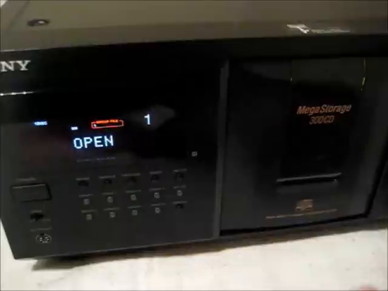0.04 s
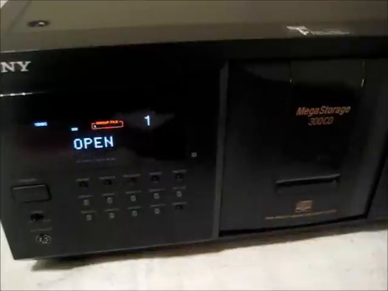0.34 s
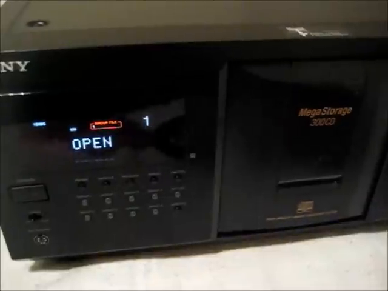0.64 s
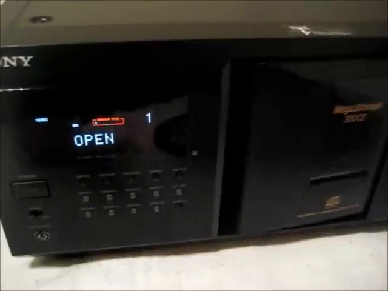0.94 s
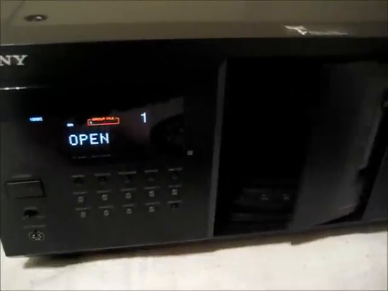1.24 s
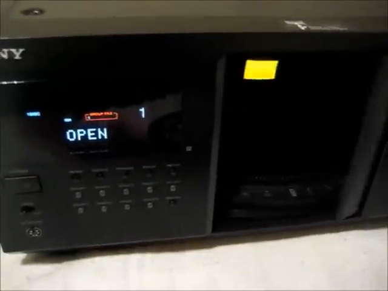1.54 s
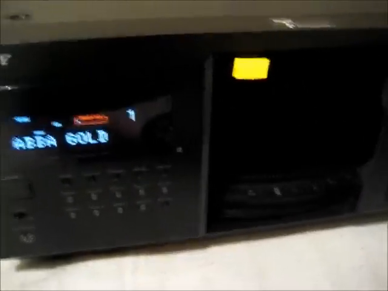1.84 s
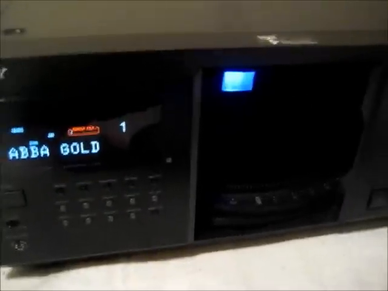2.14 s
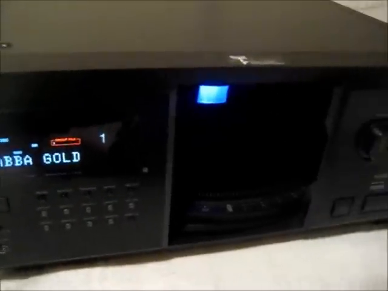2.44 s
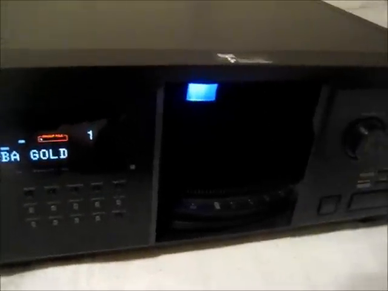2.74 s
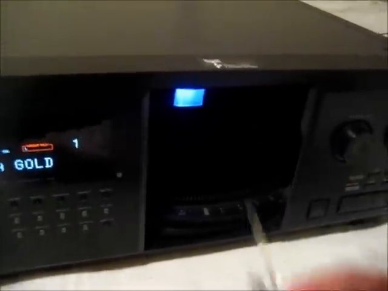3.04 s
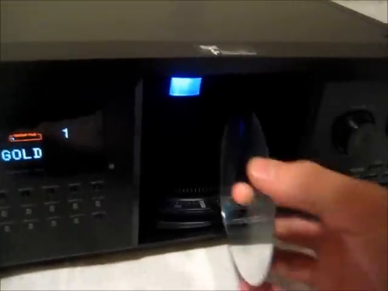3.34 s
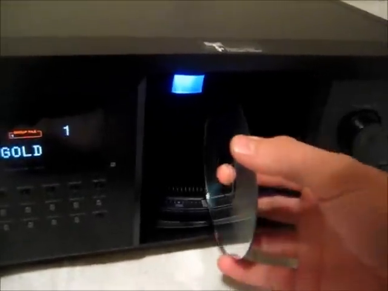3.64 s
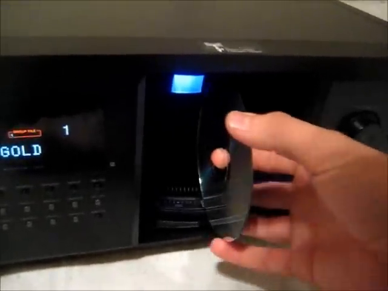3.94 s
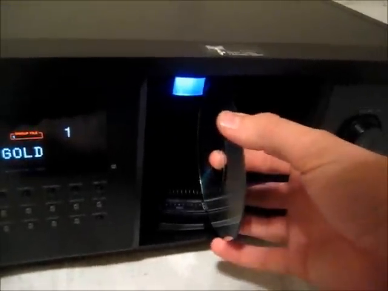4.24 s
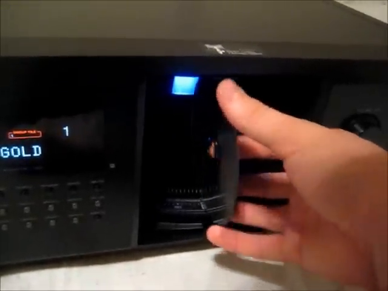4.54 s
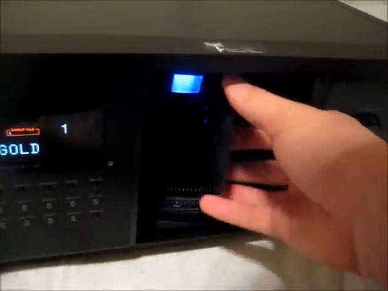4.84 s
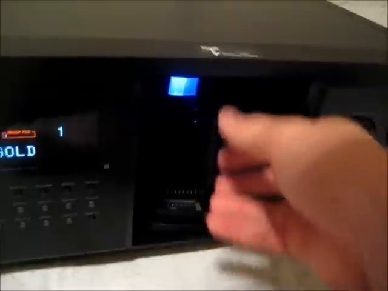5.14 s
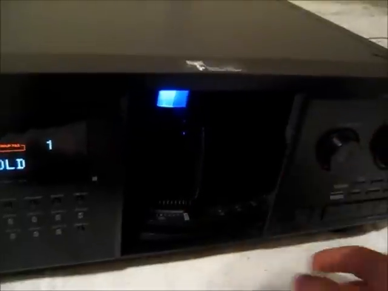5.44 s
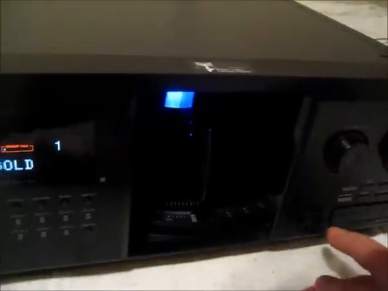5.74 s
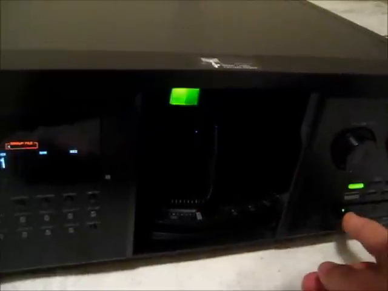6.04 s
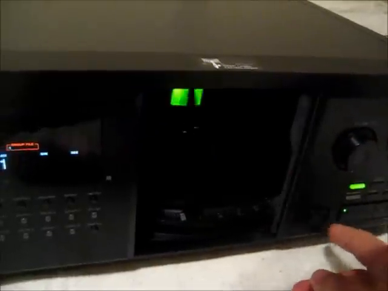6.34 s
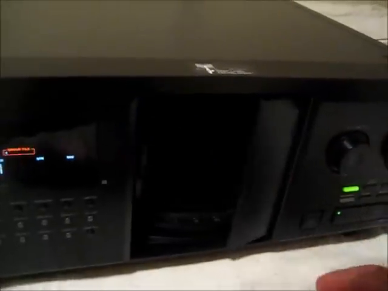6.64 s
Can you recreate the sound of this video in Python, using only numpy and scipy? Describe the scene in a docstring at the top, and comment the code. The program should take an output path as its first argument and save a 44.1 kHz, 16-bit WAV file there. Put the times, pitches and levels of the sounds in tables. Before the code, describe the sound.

A small motor slides a plastic door open with a clack; a disc drops into its slot, a button clicks, and whirring resumes.

```python
"""Carousel disc changer, close by in a small room.

A motor slides the door open until it clacks against the stop; the carousel clicks into place.
A hand feels for the slot with a disc, which drops in and rolls home. A button is pressed and the door
starts to close, over faint hiss and a thin electronic whine. Blows and friction slips ring the
resonances of the plastic parts and the sheet-metal cabinet."""
import sys
import numpy as np
from scipy import signal
from scipy.fft import rfft, irfft, next_fast_len
from scipy.io import wavfile
from scipy.ndimage import uniform_filter1d

SR = 44100
rng = np.random.default_rng(int(sys.argv[2]) if len(sys.argv) > 2 else 0)


def wrap_up_sound(samples):
    """Save the sound to the file named by the first command line argument, as 16-bit audio."""
    columns = np.atleast_2d(samples).T
    # keep every value between -1 and 1, then stretch to whole-number steps
    tamed = np.clip(columns, -1, 1)
    steps = np.round(tamed * 32767).astype(np.int16)
    wavfile.write(sys.argv[1], SR, steps)


N = 303408
TIME = np.arange(N) / SR
CUTOFF_HZ = 15900

# sheet-metal cabinet: pitch_hz, width_hz, gain_db
CABINET_MODES = [(89.6, 8.1, -6), (119.4, 5.3, -7), (138.5, 8, -3), (169, 17, -3.5), (201.3, 5.1, 7),
                 (240, 22, -3), (287.5, 8.8, -7.5), (422, 24, -9.5)]
# how well its panels radiate: freq_hz, gain_db
CABINET_RADIATION = [(50, -4), (90, -3), (130, 1.5), (300, -4), (600, -2.5)]


def from_db(db):
    """Decibels to gain."""
    return 10 ** (np.asarray(db) / 20)


def rms_one(x):
    """Scale to rms 1."""
    return x / np.sqrt(np.mean(x ** 2) + 1e-20)


def drift(rate_hz):
    """Slow random curve of rms 1."""
    knots = rng.standard_normal(4096)
    return rms_one(np.interp(TIME * rate_hz, np.arange(len(knots)), knots))


def held(start_s, stop_s, rise_s, fall_s):
    """Envelope: linear rise, hold, exponential fall."""
    return np.clip((TIME - start_s) / rise_s, 0, 1) * np.exp(-np.maximum(TIME - stop_s, 0) / fall_s)


def surge(start_s, extra_db, settle_s):
    """Gain that starts high and settles to 1."""
    return from_db(extra_db * np.exp(-(np.maximum(TIME - start_s, 0) / settle_s) ** 2))


def swell(middle_s, half_s):
    """Gaussian envelope of height 1."""
    return np.exp(-((TIME - middle_s) / half_s) ** 2)


def add(out, sound, start_s, level_db):
    """Place a short sound; its level is its energy spread over 10 ms."""
    at = round(start_s * SR)
    sound = from_db(level_db) * np.sqrt(SR / 100) * sound / np.linalg.norm(sound)
    out[at:at + len(sound)] += sound[:N - at]


def coloured(x, colour):
    """Minimum-phase filter through (freq_hz, gain_db) points."""
    size = next_fast_len(len(x) + 4096, True) * 2
    hz, db = np.transpose(colour)
    bins_hz = np.maximum(np.fft.rfftfreq(size, 1 / SR), 1)
    gain = from_db(np.interp(np.log(bins_hz), np.log(hz), db))
    cepstrum = irfft(np.log(gain))
    cepstrum[1:size // 2] *= 2
    cepstrum[size // 2 + 1:] = 0
    return irfft(rfft(x, size) * np.exp(rfft(cepstrum)))[:len(x)]


def levelled(force):
    """Flatten a burst's broad spectrum, so the struck part sets the colour."""
    power = uniform_filter1d(np.abs(rfft(force)) ** 2, size=140) + 1e-6
    hz = np.fft.rfftfreq(len(force), 1 / SR)
    return coloured(force, np.transpose([hz, -10 * np.log10(power)])[1:])


def resonate(x, modes):
    """Parallel two-pole resonators."""
    out = 0
    for pitch_hz, width_hz, gain_db in modes:
        r = np.exp(-np.pi * width_hz / SR)
        poles = [1, -2 * r * np.cos(2 * np.pi * pitch_hz / SR), r * r]
        out = out + from_db(gain_db) * (1 - r * r) / 2 * signal.lfilter([1, 0, -1], poles, x + 1e-18)
    return out


def body(x, colour, modes, ring_db):
    """A part's response: broad colour with modes standing out."""
    return coloured(x + from_db(ring_db) * resonate(x, modes), colour)


def grains(per_s, spread_db):
    """Friction: tiny slips of uneven size at random moments."""
    sizes = from_db(spread_db * np.minimum(rng.exponential(1, N), 4)) * rng.choice([-1, 1], N)
    return rms_one(sizes * (rng.random(N) < per_s / SR))


def boom():
    """The cabinet panels shudder and settle."""
    t = np.arange(SR // 2) / SR
    shudder = rng.standard_normal(len(t)) * np.exp(-t / 0.033)
    return coloured(resonate(levelled(shudder), CABINET_MODES), CABINET_RADIATION)


def blows(hits, colour, modes, ring_db, chatter_db, spring_db, click_db, boom_db):
    """Each blow: a sharp push plus dying chatter of loose plastic; a share shakes the cabinet."""
    t = np.arange(SR // 3) / SR
    out = np.zeros(N)
    for start_s, level_db, hardness_hz, chatter_t60_s in hits:
        chatter = rng.standard_normal(len(t)) * np.exp(-np.log(1000) * t / chatter_t60_s)
        force = levelled(from_db(chatter_db) * chatter / np.linalg.norm(chatter) + (t == 0))
        # a soft contact lacks treble, but for a faint click
        softness = signal.butter(2, min(hardness_hz, SR / 2 - 1000), fs=SR, output="sos")
        contact = signal.sosfilt(softness, force) + from_db(click_db) * force
        # its springiness favours pitches near that edge
        spring_hz = min(hardness_hz, CUTOFF_HZ)
        contact += resonate(force, [(spring_hz, 0.54 * spring_hz, spring_db)])
        add(out, body(contact, colour, modes, ring_db), start_s, level_db)
        add(out, boom(), start_s, level_db + boom_db)
    return out


def background():
    """Steady hiss and an electronic whine that buzzes as its phase restarts."""
    # hiss spectrum: freq_hz, gain_db
    hiss_colour = [(15, -28), (25, -8), (80, -7), (242, -1.5), (270, -8), (317, -7.5), (560, -8),
                   (1480, -12), (2160, -13.5), (4030, -15.5), (7110, -18.5), (7710, -18.5), (8590, -20),
                   (14800, -25), (16000, -37)]
    # whine partials: pitch_hz, level_db
    tones = [(7569, -60.5), (7872, -65), (15138, -60.5)]
    hiss_db, restart_hz = -47, 30
    hiss = from_db(hiss_db) * rms_one(coloured(rng.standard_normal(N), hiss_colour))
    since_restart_s = TIME % (1 / restart_hz)
    whine = sum(from_db(db) * np.sqrt(2) * np.sin(2 * np.pi * hz * since_restart_s) for hz, db in tones)
    return hiss + whine


def drive_levels():
    """Gains of motor, gears and sliding: each runs up, holds and grows with the load."""
    # door opens, then closes: start_s, slide_start_s, stop_s, motor_db, gears_db, sliding_db
    runs = [(0.025, 0.75, 1.775, -45.5, -50.5, -40.5), (6.062, 6.15, 6.88, -42, -47, -40)]
    # stiff spots of the door: middle_s, half_length_s, load_db
    strains = [(0.32, .08, 3.5), (1.06, 0.19, 7), (1.745, 0.036, 7), (6.794, .2, 4)]
    # fits of gear rattle: start_s, length_s, level_db
    rattles = [(0.222, 0.012, -43), (0.258, 0.035, -43.5), (.496, 0.097, -46.5), (.781, .017, -31.5),
               (.814, .018, -36.5), (.95, .015, -41), (1.052, 0.091, -37), (1.75, .022, -35),
               (6.26, 0.065, -39.5), (6.37, 0.084, -41), (6.552, 0.16, -42), (6.806, 0.064, -42.5)]
    gear_load_share, slide_load_share = 0.17, 0.25
    run_down_s, idle_rub_db = 0.057, -49.5
    load_db = sum(db * swell(middle_s, half_s) for middle_s, half_s, db in strains)
    motor = gears = sliding = 0
    for start_s, slide_start_s, stop_s, motor_db, gears_db, sliding_db in runs:
        turning = held(start_s, stop_s, rise_s=0.21, fall_s=run_down_s)
        moving = held(slide_start_s, stop_s, rise_s=0.26, fall_s=run_down_s)
        motor += turning * from_db(motor_db + load_db)
        gears += turning ** 2 * from_db(gears_db + gear_load_share * load_db)
        door_rub = moving * from_db(sliding_db + slide_load_share * load_db)
        sliding += np.hypot(door_rub, turning ** 2 * from_db(idle_rub_db))
    fits = sum(from_db(db) * held(start_s, start_s + length_s, rise_s=0.011, fall_s=0.006)
               for start_s, length_s, db in rattles)
    # a soft hiss swells after the door's clack, then lingers faintly
    after_hiss = from_db(-54) * held(start_s=1.9, stop_s=3.1, rise_s=0.064, fall_s=0.05)
    after_hiss *= surge(start_s=1.9, extra_db=13.5, settle_s=0.16)
    return motor, np.hypot(gears, fits), sliding + after_hiss


def motor_rumble():
    """The motor shakes the cabinet."""
    # rumble spectrum: freq_hz, gain_db
    colour = [(29, -20), (50, -18), (103, -3.5), (168, -5), (194, -2), (307, -11), (363, -8.5), (415, -2.5),
              (626, -10.5), (690, -7.5), (900, -9.5), (1170, -9.5), (1980, -120)]
    return rms_one(body(grains(per_s=1500, spread_db=1.5), colour, CABINET_MODES, ring_db=5.5))


def gear_rattle():
    """Gear teeth ring their housing, which passes only a middle band."""
    # gear housing: pitch_hz, width_hz, gain_db
    modes = [(716, 330, -12), (1058, 60, 4.5), (1338, 176, 6), (1450, 33, -7)]
    housing = signal.butter(2, [600, 1780], "band", fs=SR, output="sos")
    teeth = grains(per_s=1400, spread_db=-1.0) * from_db(2.0 * drift(rate_hz=130))
    return rms_one(signal.sosfilt(housing, resonate(teeth, modes)))


def track_rub():
    """The door rubs along its curved track; each mode comes and goes as the contact travels."""
    # sliding spectrum: freq_hz, gain_db
    colour = [(260, -31), (450, -1.5), (633, -17), (838, -2.5), (1160, -21.5), (1470, -6), (2360, -5),
              (2620, -4.5), (7180, -14.5), (9790, -16.5), (15500, -27.5)]
    # sliding door: pitch_hz, width_hz, gain_db
    modes = [(2190, 65, -15), (3090, 79, -16), (3810, 120, -12), (4530, 82, -7), (5570, 210, -15),
             (9500, 160, -12.5), (13100, 150, -7)]
    slips = grains(per_s=14000, spread_db=-1.0) * from_db(0.68 * drift(rate_hz=56))
    singing = sum(resonate(slips, [mode]) * from_db(6.9 * drift(rate_hz=6)) for mode in modes)
    return rms_one(coloured(slips + from_db(5.0) * singing, colour))


def door_drive():
    """Motor, gears and track, each under its own envelope."""
    motor, gears, sliding = drive_levels()
    return motor * motor_rumble() + gears * gear_rattle() + sliding * track_rub()


def brushes():
    """Door, fingers and disc rub on plastic; the point of contact sets each resonance."""
    # light rubs: middle_s, half_length_s, level_db, pitch_hz, width_hz
    rubs = [(0.246, 0.033, -48, 6040, 3000), (0.874, 0.031, -42.5, 3750, 500), (1.1, .12, -47, 3750, 350),
            (1.672, 0.071, -46, 2670, 90), (3.673, 0.006, -35, 2860, 300), (3.772, 0.011, -45.5, 2700, 500),
            (4.147, 0.018, -46.5, 5970, 3000), (4.524, 0.021, -36, 2260, 900),
            (4.55, 0.02, -47, 5870, 2000), (4.664, 0.017, -40.5, 2560, 1000),
            (4.882, 0.013, -35, 5000, 1390)]
    # rustle spectrum: freq_hz, gain_db
    colour = [(590, -64), (1000, -43), (1600, 0), (1980, 5.5), (2420, 0), (3790, -10), (4790, -10),
              (7920, -12), (14500, -18)]
    slips = grains(per_s=6000, spread_db=4.5)
    rustle = from_db(-11.0) * rms_one(coloured(slips, colour))
    out = np.zeros(N)
    for middle_s, half_s, level_db, pitch_hz, width_hz in rubs:
        singing = rms_one(resonate(slips, [(pitch_hz, width_hz, 0)]))
        out += from_db(level_db) * swell(middle_s, half_s) * (rustle + singing)
    return out


def door_clacks():
    """The door ticks past its latch, hits its stop and rebounds; one more tick as it closes."""
    # door impacts: start_s, level_db, hardness_hz, chatter_t60_s
    hits = [(1.7362, -34.5, 9000, 0.011), (1.7765, -36, 6000, .01), (1.7925, -34.5, 950, 0.013),
            (1.8523, -26.5, 4500, 0.081), (1.8672, -20, 4470, 0.022), (1.8703, -14.5, 10000, 0.0047),
            (1.872, -17.5, 600, 0.015), (1.8823, -16.5, 660, 0.038), (6.6152, -33, 5900, .014)]
    # door response: freq_hz, gain_db
    colour = [(50, -7), (110, -2.5), (400, -0.5), (750, -3), (1050, 2), (1500, 1), (2100, -1.5),
              (2900, 1.5), (3900, 6.5), (4650, 0), (5400, 3), (8500, 0), (15500, -8)]
    # door resonances: pitch_hz, width_hz, gain_db
    modes = [(441, 40, -3), (560, 60, -11), (650, 36, 6), (790, 70, -1), (1255, 70, -4), (1500, 90, -6),
             (2870, 250, -8)]
    return blows(hits, colour, modes,
                 ring_db=10.0, chatter_db=17.5, spring_db=-4.5, click_db=-27.0, boom_db=-30.0)


def ticking():
    """Faint, very high ticks while the carousel settles."""
    ticks = rms_one(resonate(grains(per_s=55, spread_db=-4.0), [(13900, 1000, 0)]))
    return from_db(-61.5) * held(start_s=1.92, stop_s=2.73, rise_s=0.1, fall_s=0.03) * ticks


def carousel():
    """The carousel latches, then rocks in its play; light knocks chatter longer than firm ones."""
    # latch and rocking: start_s, level_db, hardness_hz
    knocks = [(2.3181, -18, 13000), (2.3255, -30, 3000), (2.352, -39, 1400), (2.41, -45, 1800),
              (2.435, -39, 1500), (2.458, -38.5, 4500), (2.466, -37.5, 1000), (2.538, -39, 1500),
              (2.561, -31.5, 970), (2.614, -42.5, 4500), (5.5805, -41.5, 905), (5.6604, -45, 900),
              (5.7532, -41, 1060)]
    # carousel response: freq_hz, gain_db
    colour = [(120, -22), (230, -18), (330, -1), (650, -9.5), (950, 4), (1250, -15.5), (1600, -10.5),
              (2300, -2), (4000, -4.5), (5700, -5), (9000, -20), (15500, -32)]
    # carousel resonances: pitch_hz, width_hz, gain_db
    modes = [(328, 90, -5), (630, 73, 13), (900, 48, 0.5), (1500, 130, 4), (4380, 200, -7)]
    ref_t60_s, ref_db, halving_db = 0.029, -41, 15.5
    hits = [(start_s, db, hardness_hz, ref_t60_s * 0.5 ** ((db - ref_db) / halving_db))
            for start_s, db, hardness_hz in knocks]
    return blows(hits, colour, modes,
                 ring_db=3.5, chatter_db=7.0, spring_db=0.5, click_db=-11.0, boom_db=-36.0)


def judder():
    """The carousel drive chatters briefly against its brake."""
    # judder spectrum: freq_hz, gain_db
    colour = [(240, -56), (400, -27), (756, -18), (1060, -11.5), (1210, -11), (1910, -5), (2580, -10),
              (2960, -9.5), (3390, -15.5), (4880, -13.5), (7130, -24.5), (9660, -24.5), (15000, -44)]
    # drive resonances: pitch_hz, width_hz, gain_db
    modes = [(1040, 81, 0.5), (1305, 73, 1), (1950, 110, -8), (2160, 81, -7), (3000, 50, -1),
             (4950, 150, -9), (5470, 70, 0), (6500, 77, 3)]
    braking = from_db(-23.5) * held(start_s=2.9015, stop_s=2.941, rise_s=0.001, fall_s=0.0035)
    return braking * rms_one(body(grains(per_s=6800, spread_db=-1.5), colour, modes, ring_db=5.5))


def slot_taps():
    """The held disc knocks against the slot."""
    # taps: start_s, level_db, hardness_hz, chatter_t60_s
    hits = [(3.6675, -31.5, 517, .04), (3.6975, -36.5, 6000, .01), (3.8288, -36.5, 5500, .025),
            (3.866, -39.5, 557, 0.022), (4.062, -22.5, 1480, 0.093), (4.1226, -37, 2600, .025),
            (4.159, -43, 7000, .03), (4.2085, -22, 2360, .048), (4.516, -39, 2600, .09),
            (4.6634, -36, 2620, .1)]
    # slot response: freq_hz, gain_db
    colour = [(150, -19), (300, -10.5), (500, -4), (800, -4.5), (1300, 3), (1900, 0.5), (2450, 3),
              (3800, -8.5), (5300, 0.5), (12000, -9)]
    # slot resonances: pitch_hz, width_hz, gain_db
    modes = [(451, 30, 4), (820, 70, 1.5), (1280, 29, -13), (1864, 40, -2.5), (2300, 130, -5),
             (2600, 31, -10), (2900, 160, -6)]
    return blows(hits, colour, modes,
                 ring_db=7.5, chatter_db=11.5, spring_db=-4.0, click_db=-28.0, boom_db=-22.0)


def hand_bumps():
    """The hand leans on the cabinet, which booms softly."""
    # soft pushes: start_s, level_db
    pushes = [(3.668, -36.5), (3.75, -40), (3.866, -31), (4.07, -36), (4.13, -35), (4.2088, -30),
              (4.483, -33), (4.663, -45), (5.998, -36.5), (6.128, -30.5)]
    out = np.zeros(N)
    for start_s, level_db in pushes:
        add(out, boom(), start_s, level_db)
    return out


def disc_drop():
    """The disc bounces and rolls down its slot; both ring its modes and shake the cabinet."""
    # drop and bounces: start_s, level_db, hardness_hz, chatter_t60_s
    hits = [(4.914, -8, 10900, 0.032), (4.9585, -17.5, 8200, 0.044), (4.962, -16.5, 1950, 0.048),
            (5.011, -31, 12000, 0.031), (5.042, -24.5, 12000, .03), (5.056, -21.5, 13100, 0.096)]
    # disc response: freq_hz, gain_db
    colour = [(150, -50), (300, -15), (520, -19), (750, -5), (1150, -2), (1900, -2), (2400, -7),
              (3050, -3.5), (3800, -7.5), (4800, -13.5), (5600, -8), (8000, -17.5), (11200, -20),
              (15500, -33)]
    # disc resonances: pitch_hz, width_hz, gain_db
    modes = [(570, 15, -6), (750, 13, -4), (863, 13, -2), (1106, 22, -8), (1290, 25, -9.5), (1480, 35, -12),
             (1635, 25, -13), (1884, 42, 6), (2400, 94, -4), (2990, 90, -0.5), (3710, 92, -6),
             (4470, 45, -4), (5500, 50, -10), (6420, 55, -11), (9000, 200, -16)]
    knocks = blows(hits, colour, modes,
                   ring_db=6.0, chatter_db=18.0, spring_db=-4.5, click_db=-26.0, boom_db=-22.0)
    slips = grains(per_s=5000, spread_db=2.0)
    rolling = rms_one(body(slips, colour, modes, ring_db=16.0))
    shaking = rms_one(coloured(resonate(slips, CABINET_MODES), CABINET_RADIATION))
    trundle = rms_one(resonate(slips, [(273, 90, 0)]))
    roll_gain = from_db(-27) * held(start_s=4.92, stop_s=5.083, rise_s=0.0068, fall_s=0.014)
    roll_gain *= surge(start_s=4.92, extra_db=6.5, settle_s=0.055)
    return knocks + roll_gain * (rolling + from_db(-14.0) * shaking + from_db(-11.0) * trundle)


def button():
    """The button clicks as it is pressed, held and let go."""
    # clicks: start_s, level_db, hardness_hz, chatter_t60_s
    hits = [(5.9953, -13.5, 11100, 0.044), (6.08, -37, 1170, 0.14), (6.104, -37.5, 7000, .048),
            (6.1265, -27, 6030, .051), (6.129, -25, 4500, .025), (6.166, -39, 1800, .039)]
    # button response: freq_hz, gain_db
    colour = [(180, -34), (400, -28.5), (900, -3), (1600, -1.5), (2150, 4), (2700, -2.5), (3300, 0),
              (4300, -8), (4900, -4.5), (6700, -12.5), (10000, -13.5), (15500, -24)]
    # button resonances: pitch_hz, width_hz, gain_db
    modes = [(510, 35, 8.5), (707, 26, -1), (1080, 14, -5), (1830, 41, -19), (2060, 150, -10),
             (2250, 220, -6), (3140, 180, -6), (3900, 180, 1), (4960, 70, -17), (6650, 270, -1)]
    return blows(hits, colour, modes,
                 ring_db=4.0, chatter_db=12.0, spring_db=-4.5, click_db=-26.0, boom_db=-28.0)


def room(x, t60_s, gap_s):
    """Diffuse reflections build up after a short gap and die away."""
    # room response: freq_hz, gain_db
    colour = [(100, 7.5), (500, -1.5), (1500, -1.5), (3500, -3), (7000, 0.5), (15000, -21)]
    t = np.arange(SR) / SR
    build_up = 1 - np.exp(-(t / gap_s) ** 2)
    tail = coloured(rng.standard_normal(SR), colour) * np.exp(-np.log(1000) * t / t60_s) * build_up
    return signal.fftconvolve(x, tail / np.linalg.norm(tail))[:N]


def scene():
    """The changer heard from one point; each part sends its own share into the room."""
    # sound, send_db
    parts = [(door_drive() + brushes(), -18.0), (door_clacks(), -28.0), (carousel(), -20.0),
             (judder(), -15.0), (slot_taps() + hand_bumps(), -19.0), (disc_drop(), -22.0),
             (button(), -17.0)]
    direct = sum(sound for sound, _ in parts)
    sent = sum(from_db(send_db) * sound for sound, send_db in parts)
    mono = direct + room(sent, t60_s=0.38, gap_s=0.0097) + background() + ticking()
    return np.array([mono, mono])


def record(dry):
    """Clip at full scale, then low-pass steeply."""
    lowpass = signal.ellip(10, 0.1, 80, CUTOFF_HZ, fs=SR, output="sos")
    return signal.sosfilt(lowpass, np.clip(dry, -1, 1))


dry = scene()
out = record(dry)
wrap_up_sound(out)
```